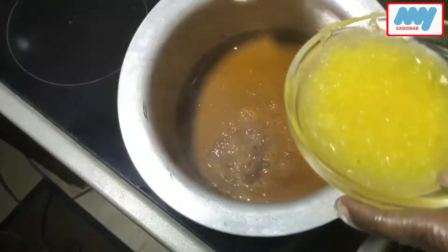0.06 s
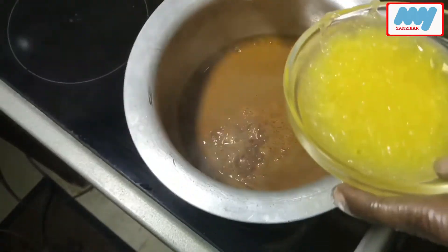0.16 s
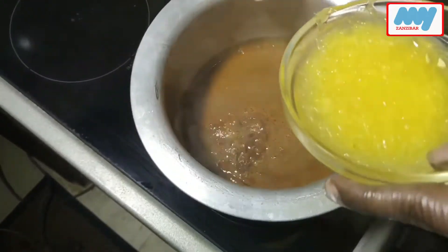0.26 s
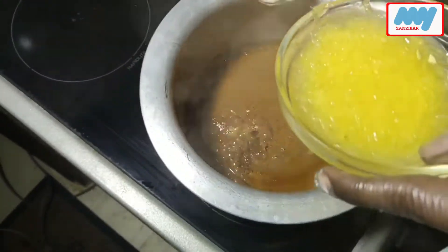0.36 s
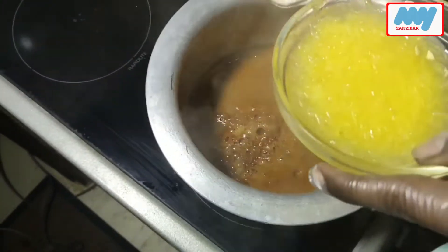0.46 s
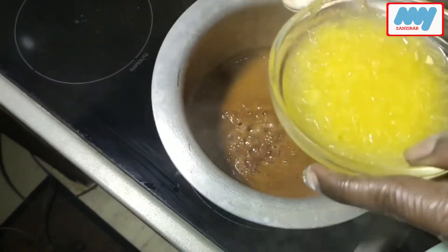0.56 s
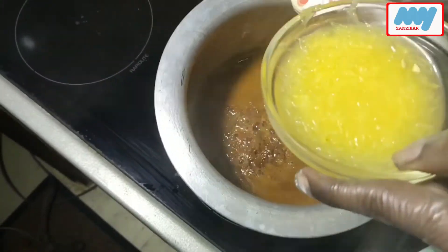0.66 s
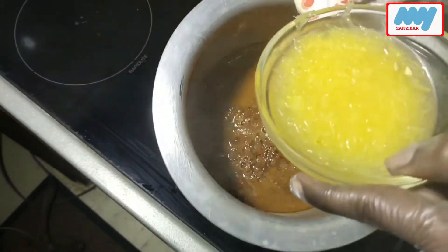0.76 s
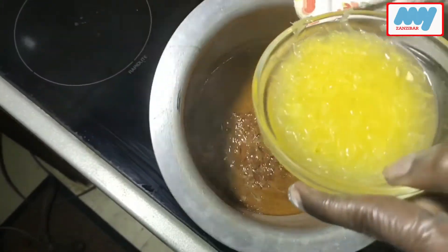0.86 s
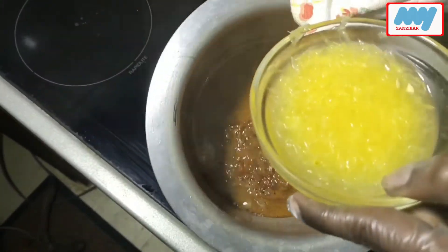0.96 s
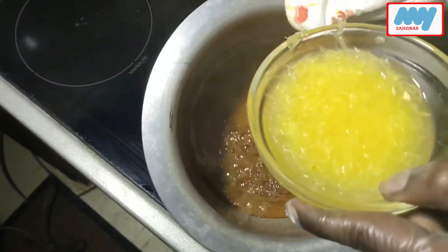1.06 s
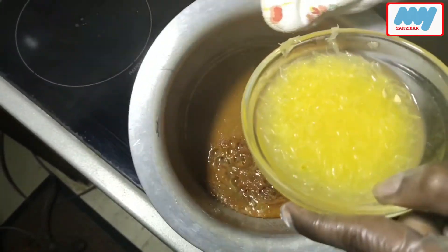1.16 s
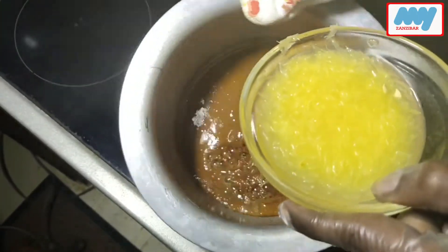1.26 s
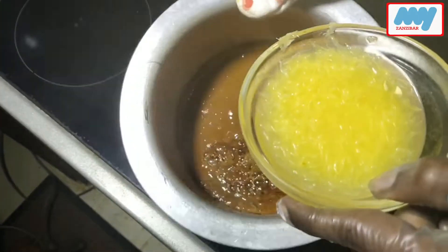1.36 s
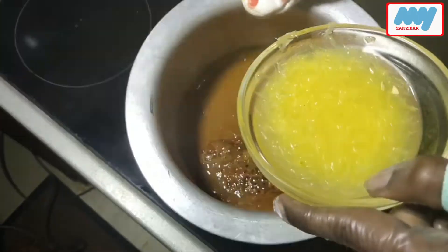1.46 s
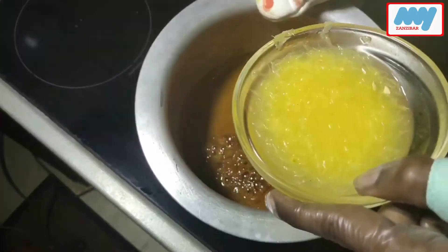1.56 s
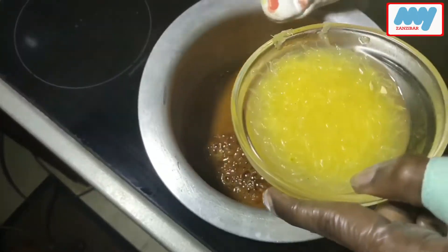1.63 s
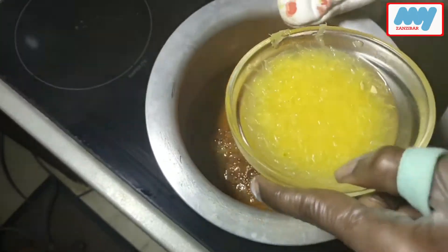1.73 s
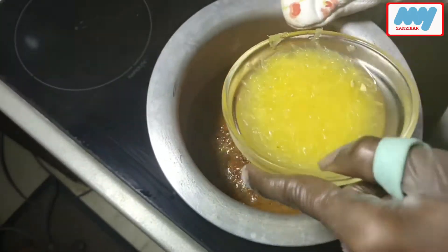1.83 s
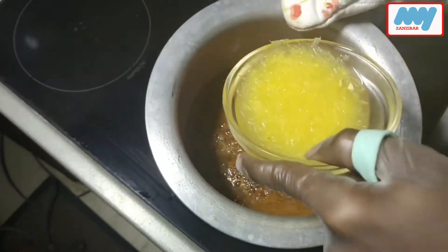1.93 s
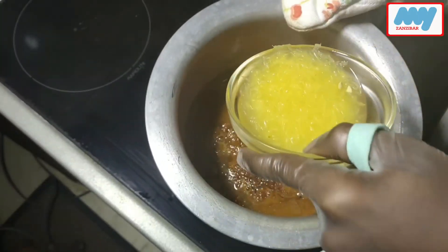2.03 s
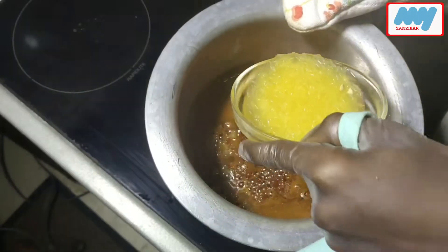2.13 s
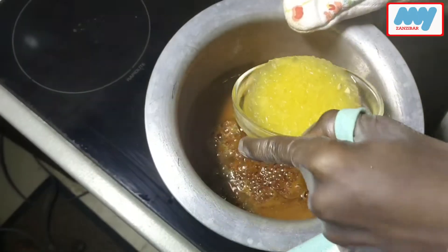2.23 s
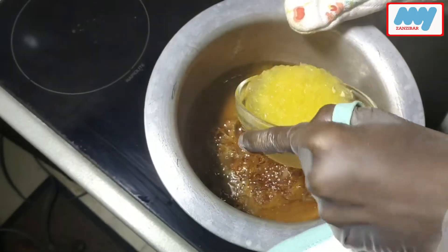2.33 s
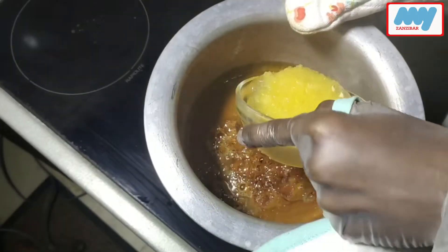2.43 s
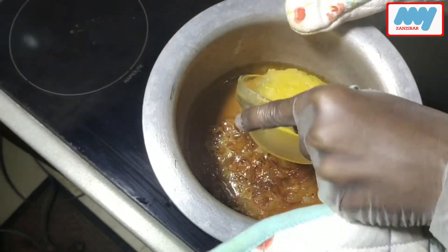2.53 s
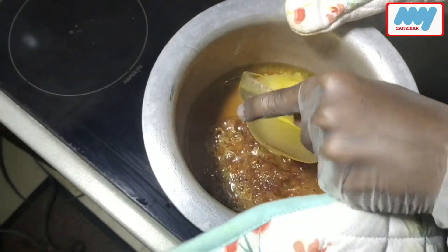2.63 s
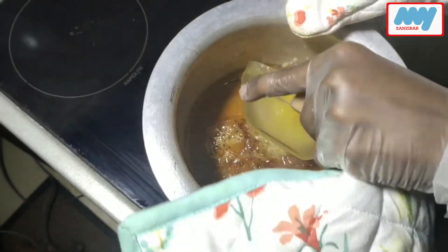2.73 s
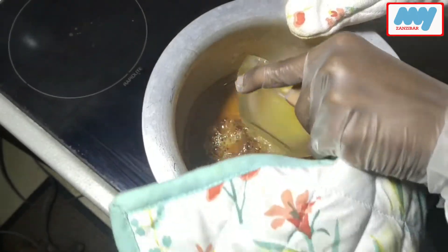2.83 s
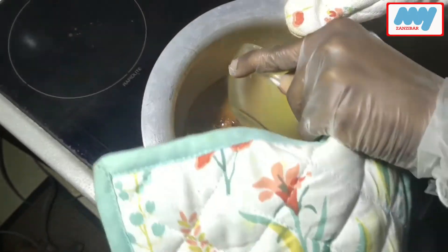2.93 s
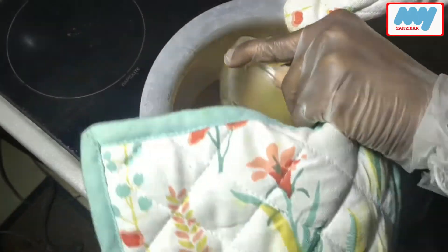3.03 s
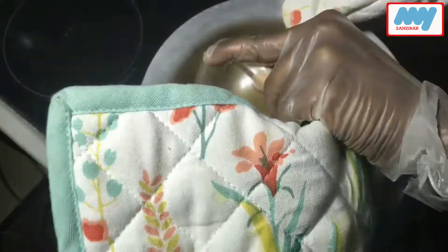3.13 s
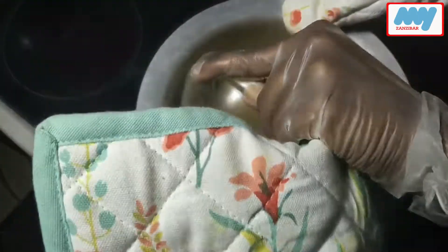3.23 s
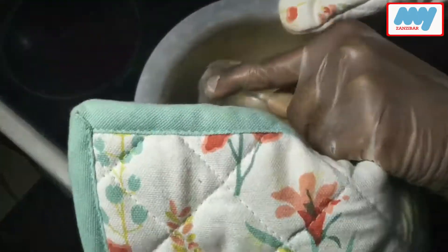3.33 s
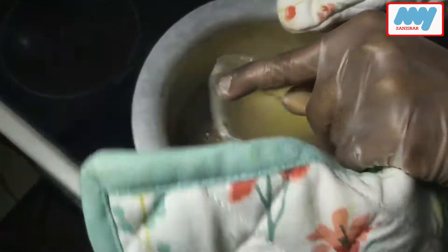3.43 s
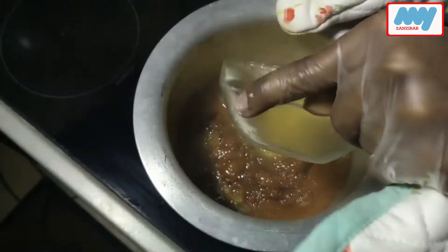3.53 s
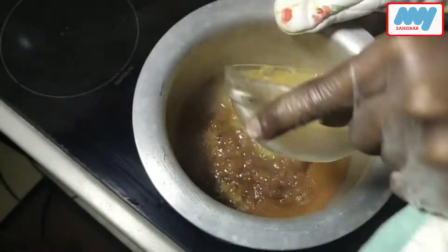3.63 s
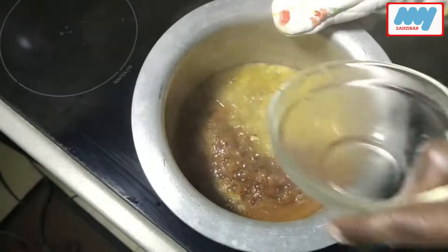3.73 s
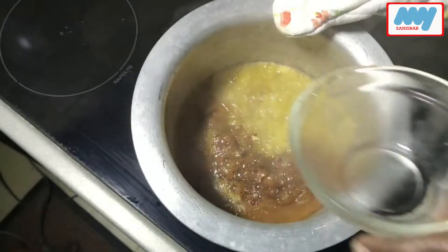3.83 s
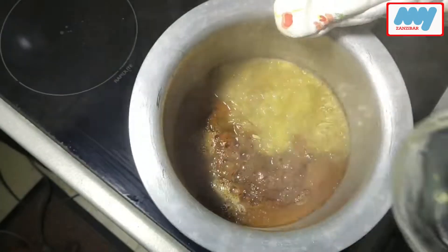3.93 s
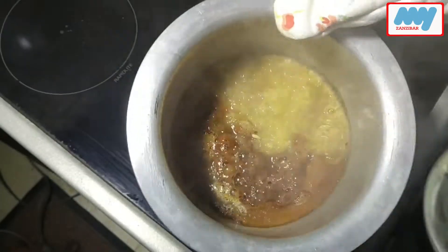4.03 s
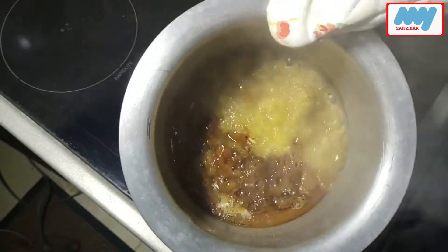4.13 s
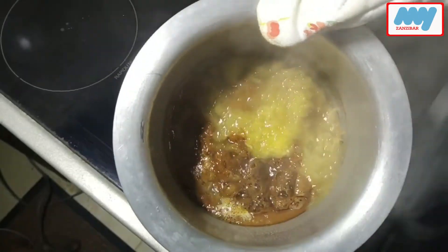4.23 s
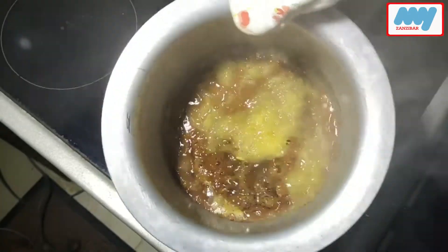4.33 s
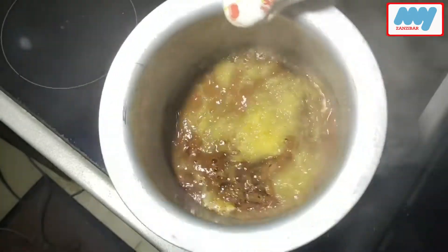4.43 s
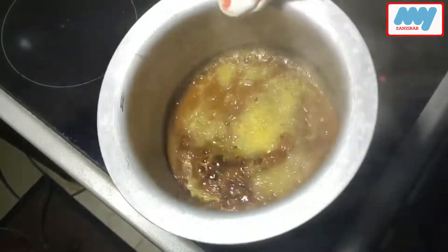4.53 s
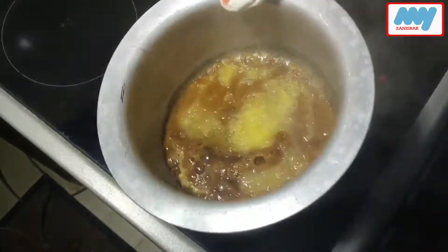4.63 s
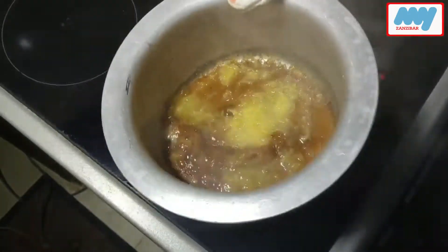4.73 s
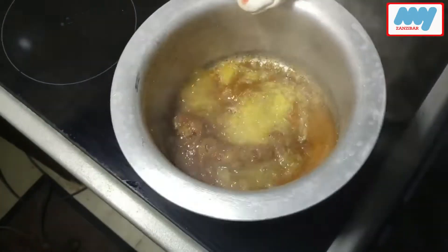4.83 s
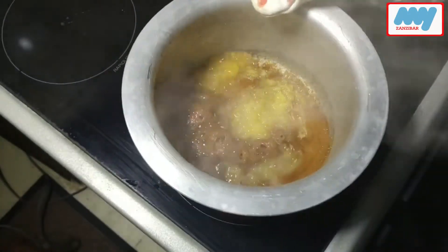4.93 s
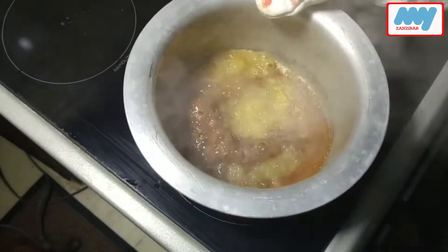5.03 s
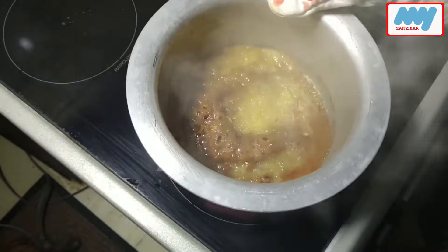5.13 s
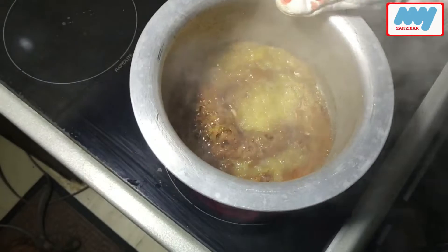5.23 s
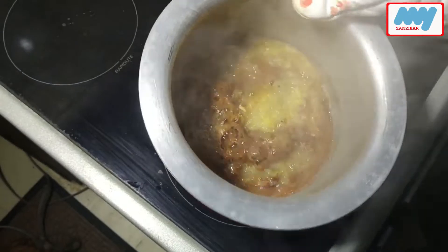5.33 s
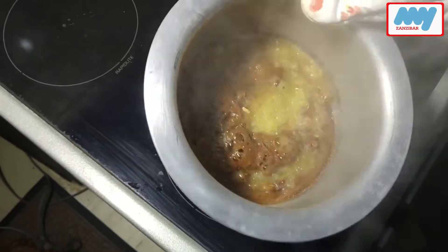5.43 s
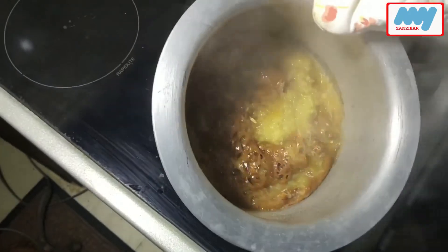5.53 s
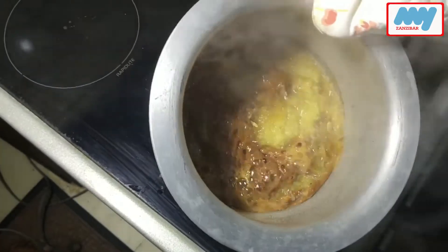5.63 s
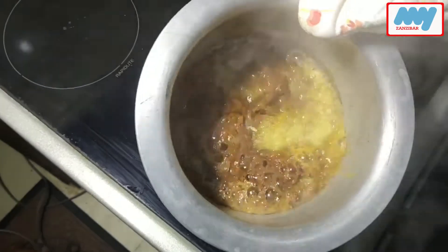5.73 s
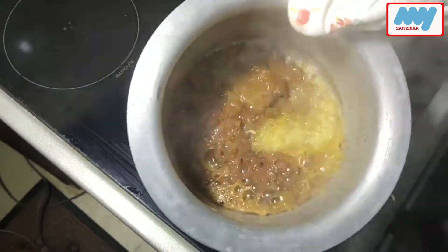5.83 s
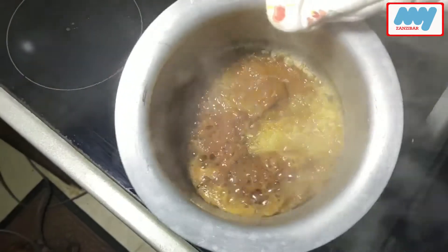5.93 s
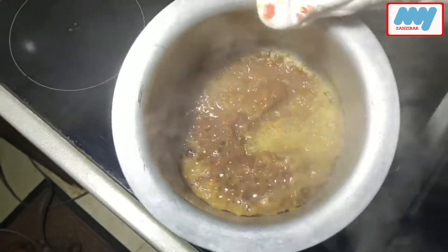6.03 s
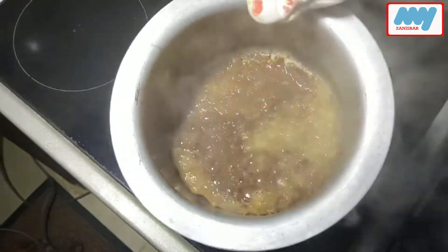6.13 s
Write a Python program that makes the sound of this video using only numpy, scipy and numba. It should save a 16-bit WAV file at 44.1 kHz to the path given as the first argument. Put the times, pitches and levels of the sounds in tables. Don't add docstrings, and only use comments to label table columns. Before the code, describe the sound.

Hot syrup hisses unevenly in a pot, with a soft early thud and crackling vents of steam. It quiets to near stillness, then poured juice brings burbling, squeaky bubble chirps and a rising, dense sizzle. Later the pot is rocked, thumping the glass hob, and the hiss peaks at the end. Close, central microphone in a kitchen, with a low buzz cycling on and off beneath.

```python
import sys
import numpy as np
from scipy import signal
from scipy.fft import rfft, irfft, next_fast_len
from scipy.io import wavfile
from scipy.ndimage import uniform_filter1d
from numba import njit

SR = 44100
rng = np.random.default_rng(int(sys.argv[2]) if len(sys.argv) > 2 else 0)


def convert_level_to_amplitude(level_db):
    exponent = np.asarray(level_db, float) / 20
    return 10 ** exponent


def unload_wav(signal):
    wavfile.write(
        sys.argv[1],
        SR,
        np.round(np.clip(np.atleast_2d(signal).T, -1, 1) * 32767).astype(np.int16),
    )


N = 272802
SIZE = next_fast_len(N)
FREQ = np.maximum(np.fft.rfftfreq(SIZE, 1 / SR), 1)
CALM_BOIL_DB, CALM_STEAM_DB = -44, -41


def unit(x):
    return x / np.sqrt(np.mean(x ** 2))


def curves(table):
    s, *columns = np.transpose(table)
    return [np.interp(np.arange(N) / SR, s, column) for column in columns]


def stage(times):
    return np.interp(np.arange(N) / SR, np.sort(times), (0, 1, 1, 0))


def walk(rate):
    hold = int(SR / rate)
    steps = np.repeat(rng.standard_normal(N // hold + 1), hold)[:N]
    return unit(uniform_filter1d(uniform_filter1d(steps, hold), hold))


def shape(x, gain):
    return irfft(rfft(x, SIZE) * gain, SIZE)[:N]


def colour(x, spectrum, lo_hz, hi_hz):
    hz, db = np.transpose(spectrum)
    edges = 1 / np.sqrt((1 + (lo_hz / FREQ) ** 16) * (1 + (FREQ / hi_hz) ** 16))
    tilt = convert_level_to_amplitude(np.interp(np.log(FREQ), np.log(hz), db))
    return unit(shape(x, tilt * edges))


def resonate(x, modes):
    power = 0
    for hz, width, db in modes:
        detune = (FREQ - hz * hz / FREQ) / width
        power = power + convert_level_to_amplitude(2 * db) / (1 + detune ** 4) ** 2
    return unit(shape(x, np.sqrt(power)))


def ring(t, hz, t60):
    return np.sin(2 * np.pi * hz * t) * np.exp(-np.log(1000) * t / t60)


@njit
def grains(start, hz, length, size, glide):
    out = np.zeros(N + SR)
    for k in range(len(start)):
        z, turn = size[k] + 0j, np.exp(2j * np.pi * hz[k] / SR)
        bend = np.exp(2j * np.pi * hz[k] * glide / SR / length[k])
        for i in range(length[k]):
            z = z * turn
            turn = turn * bend
            u = i / length[k]
            out[start[k] + i] += z.imag * u * (1 - u) * (1 - u)
    return out[:N]


def pops(rate, lo_hz, hi_hz, cycles, spread_db):
    when, pitch, ringing, size = rng.random((int(rate * N / SR), 4)).T
    hz = lo_hz + (hi_hz - lo_hz) * pitch
    length = (cycles * (0.21 + 1.72 * ringing) * SR / hz).astype(np.int64) + 8
    gain = convert_level_to_amplitude(spread_db * np.minimum(-np.log(size), 4.5)) / np.sqrt(length)
    return unit(grains((when * N).astype(np.int64), hz, length, gain, 0.03))


# (time [s], sizzle level [dB], fineness of the spray [dB])
STEAM = [(0, -31.5, -4.5), (.43, -37, 0), (.88, -43, 2), (1.21, -36.5, -3), (1.28, -29, 3),
         (1.62, -35.5, 3), (2.12, -46, -6), (2.79, -42, -4), (2.83, -36.5, 0), (3.35, -33.5, 3.5),
         (3.75, -25, 2.5), (4.4, -25.5, 1.5), (4.73, -27, 4), (4.88, -23, 3.5), (5.4, -29, -1.5),
         (5.65, -29.5, 2.5), (5.73, -21, -2.5), (6.19, -19.5, 1.5)]
# (frequency [Hz], level per Hz [dB])
SIZZLE_COLOUR = [(1500, 9), (2500, 8), (3500, -3.5), (5160, -3.5), (6200, -6), (9010, 3), (11100, -0.5),
                 (16000, -4.5)]
# (time [s], rise over the sizzle [dB], length [s])
SPURTS = [(0.085, 5, 0.1), (0.788, 6.5, 0.018), (0.962, 5, 0.014), (1.092, 6.5, 0.014), (1.136, 8.5, 0.014),
          (1.538, 5.5, 0.014), (1.655, 6, 0.02), (1.758, 8.5, 0.014), (1.833, 6.5, 0.02), (1.897, 0, .02),
          (1.952, 11, 0.019), (2.011, 7.5, 0.056), (2.124, 7.5, 0.014), (2.167, 5, 0.021),
          (2.195, 9.5, 0.015), (2.287, 7, 0.029), (2.315, 8, 0.019), (2.342, 9, 0.017), (2.395, 3, 0.068),
          (2.552, 5, 0.014), (2.602, 2, 0.03), (2.691, 7.5, 0.012), (2.721, 6.5, .01), (2.763, 8, 0.012),
          (2.835, 6, 0.028), (2.97, 2.5, 0.037), (3.03, 8, 0.016), (3.095, 6, 0.028), (3.135, 6.5, 0.029),
          (4.27, 1.5, 0.05)]
# (low [Hz], high [Hz], level [dB], share following the boil instead of the steam [0-1],
# pull of fineness [dB per dB], share of vents [0-1])
SPRAY = [(1846, 2400, -7.5, 0.81, -.3, 0.23), (3620, 6030, -4, 0.38, -.3, 0.49),
         (5860, 11440, -1.96, 0.038, .02, 0.94), (11200, 39000, -13.5, .05, 1.05, 0.73)]


def sizzle():
    t = np.arange(N) / SR
    (main_db, fine_db), boil_db = curves(STEAM), curves(BOIL)[0]
    flutter_db = np.interp(main_db, (-44, -28), (2.07, 0.54))
    vents_db = 0.15 * walk(14) + flutter_db * walk(40) + 0.26 * walk(150)
    for s, db, length in SPURTS:
        near = slice(max(int((s - 0.1) * SR), 0), int((s + 0.1) * SR))
        width = np.where(t[near] < s, 0.27, 0.35) * length
        vents_db[near] += db * np.exp(-0.5 * ((t[near] - s) / width) ** 2)
    bubbly_db = np.interp(main_db, (-44, -30), (-2.5, -6.5))
    bubbles = pops(rate=2200, lo_hz=2400, hi_hz=16000, cycles=75, spread_db=2.5)
    hiss = rng.standard_normal(N)
    source = (hiss + convert_level_to_amplitude(bubbly_db) * bubbles) / np.sqrt(1 + convert_level_to_amplitude(2 * bubbly_db))
    out = 0
    for lo, hi, db, boil_share, pull, vent_share in SPRAY:
        follow_db = main_db + boil_share * (boil_db - main_db) + pull * fine_db + vent_share * vents_db
        band = colour(source, SIZZLE_COLOUR, lo, hi)
        out = out + band * convert_level_to_amplitude(db + follow_db + 0.5 * walk(21.91))
    return out, vents_db


# (time [s], level [dB])
BOIL = [(0, -44), (.2, -42.5), (.5, -45), (1.2, -45.5), (1.3, -43.5), (1.8, -47.5), (2.5, -50.5),
        (2.77, -52.5), (2.84, -40), (3.1, -39.5), (3.55, -36), (3.85, -33.5), (4.27, -32), (4.66, -36),
        (4.9, -32.5), (5.58, -32.5), (5.74, -30), (6.19, -31.5)]
# (frequency [Hz], width [Hz], level [dB])
POT = [
    [(497, 87, 3), (608, 143, 6.5), (706, 100, 3)],
    [(819, 340, 2), (1069, 240, 5), (1184, 97, -1)],
    [(1341, 190, -5), (1498, 150, 1), (1620, 200, 0.5), (1800, 160, -17)],
    [(2684, 560, -3.5), (3140, 570, -1.5), (3600, 300, -7)],
]
# (calm-boil level [dB], slope [dB per dB of boil], under the bowl [dB],
# first splash [dB], share of vents [0-1])
ANSWER = [(-48.5, 0.6433, 2, 4, .05), (-49, 0.7256, -12, 7, 0.25), (-48, 0.81, -1, 11, 0.21),
          (-45.5, 0.96, -1.5, 3, 0.51)]
# (frequency [Hz], width [Hz], level [dB])
COVER_MODE = [(548, 154, 0)]
# (starts to sink [s], lowest [s], tips away [s], clear [s])
BOWL_S = (2.1, 2.45, 2.74, 2.81)
POUR_S, COVER_DB = (2.59, 2.66, 3.3, 3.9), -47


def boil(vents_db):
    low_pops = pops(rate=500, lo_hz=350, hi_hz=2000, cycles=10, spread_db=2.2)
    high_pops = pops(rate=300, lo_hz=2300, hi_hz=3800, cycles=40, spread_db=2.4)
    low = rng.standard_normal(N) + convert_level_to_amplitude(-19) * low_pops
    high = rng.standard_normal(N) + convert_level_to_amplitude(-17) * high_pops
    vigour, bowl, pour = curves(BOIL)[0] - CALM_BOIL_DB, stage(BOWL_S), stage(POUR_S)
    slow = uniform_filter1d(vigour, SR)
    sources, drives = (low, low, low, high), (slow, vigour, vigour, vigour)
    out = resonate(rng.standard_normal(N), COVER_MODE) * convert_level_to_amplitude(COVER_DB) * pour
    for modes, source, drive, answer in zip(POT, sources, drives, ANSWER):
        db, slope, bowl_db, splash_db, vent_share = answer
        answer_db = db + slope * drive + bowl * (bowl_db + splash_db * pour) + vent_share * vents_db
        out = out + resonate(source, modes) * convert_level_to_amplitude(answer_db + 0.7 * walk(25.02))
    return out


# (time [s], pitch
# [Hz], rms level [dB], length [s])
WHISTLES = [(0.109, 2760, -35.5, 0.018), (0.153, 2850, -35, .02), (0.453, 251, -51, 0.046),
            (0.532, 240, -44, 0.03), (4.95, 5370, -27, 0.022), (5.029, 5470, -22.5, .02),
            (2.119, 2990, -43, 0.0096), (2.125, 10000, -50, .01), (2.127, 7700, -43, .01),
            (2.173, 6900, -37, .01), (2.196, 5200, -35, 0.013), (2.2, 10000, -39, .01),
            (2.308, 5730, -36, .01), (2.345, 10100, -55, 0.013), (2.707, 557, -47, 0.036),
            (2.83, 5070, -35, .02), (2.822, 3600, -36, 0.016), (2.86, 2470, -38.5, 0.013),
            (2.875, 3410, -40, 0.022), (2.883, 2490, -35.5, 0.017), (2.904, 1466, -34, .03),
            (2.967, 2540, -27.5, .018), (2.971, 5170, -34, .02), (3.036, 2610, -35, 0.034),
            (3.143, 1650, -34, .04), (3.229, 1620, -32.5, 0.068), (3.375, 2660, -38, .03)]


def whistles():
    out = np.zeros(N)
    for s, hz, db, length in WHISTLES:
        t = np.arange(int(2 * length * SR)) / SR
        breath = uniform_filter1d(rng.standard_normal(8820), size=160)[:len(t)]
        tone = np.sin(2 * np.pi * hz * t + 10 * breath) * np.hanning(len(t))
        at = int((s - length) * SR)
        out[at:at + len(t)] += convert_level_to_amplitude(db - 1.5) * tone
    return out


# (time [s], thud peak [dB], thud pitch [Hz], rim over thud [dB], tick over thud [dB])
KNOCKS = [(0.5813, -20, 174, -8, -3), (0.691, -31.5, 200, 3, -5), (0.961, -38, 135, -14, -20),
          (1.8219, -30.5, 180, -4, 8), (1.874, -39, 175, 10, -6), (1.8839, -33, 175, -9, -20),
          (1.922, -45, 190, 3, -5.5), (2.0605, -53.5, 200, 22, 6), (3.956, -19.5, 186, 3.5, -16),
          (4.475, -29.5, 198, -3, -11), (5.0617, -9.5, 174, -7.5, -4), (5.197, -24.5, 196, 2, -16)]


def knocks():
    out, t = np.zeros(N + SR), np.arange(SR // 2) / SR
    rattle = resonate(rng.standard_normal(N), [(164, 43, -1), (264, 280, -11), (89.5, 87, -7.5)])
    rattle_swell = np.clip(t / 0.032, 0, 1) ** 2 * np.exp(-np.log(1000) * t / 0.52)
    late = np.maximum(t - 0.0019, 0)
    choke = np.exp(-(t / 0.0225) ** 3)
    tick = np.cos(2 * np.pi * 1200 * (t - 0.0011)) * np.exp(-((t - 0.001) / 0.0007) ** 2)
    rim = np.sin(2 * np.pi * 600 * (t - 0.0008)) * np.exp(-((t - 0.003) / 0.002) ** 2) * (t > 0.0008)
    for s, db, hz, rim_db, tick_db in KNOCKS:
        at = int(s * SR)
        thud = (ring(late, hz, 0.3) + convert_level_to_amplitude(-7) * ring(late, 1.42 * hz, 0.2)) * choke
        tail = convert_level_to_amplitude(-13.5) * rattle[at:at + len(t)] * rattle_swell
        contact = 0.73 * thud - convert_level_to_amplitude(rim_db) * rim - convert_level_to_amplitude(tick_db) * tick + tail
        out[at:at + len(t)] += convert_level_to_amplitude(db) * contact
    return signal.sosfilt(signal.butter(2, 105, "high", fs=SR, output="sos"), out[:N])


# (on [s], off [s], level [dB])
HOB = [
    (0.07, 0.264, -56),
    (0.387, 1.342, -54.5),
    (1.413, 2.3, -57),
    (2.423, 3.38, -54.5),
    (3.59, 4.296, -53),
    (4.47, 5.048, -55),
    (5.273, 5.88, -50),
]


def hob():
    t, power = np.arange(N) / SR, 0
    for on, off, db in HOB:
        power = power + convert_level_to_amplitude(db) * np.clip(np.minimum(t - on, off - t) / 0.0074, 0, 1)
    hum_hz = 203.4 * (1 + 0.00814 * walk(12))
    phase = 2 * np.pi * np.cumsum(hum_hz) / SR
    return np.sqrt(2) * power * np.sin(phase) * convert_level_to_amplitude(2.2 * walk(18))


# (frequency [Hz], level per Hz [dB])
RUMBLE_COLOUR = [(14, -40), (22, -25.5), (107, -20.5), (171, -4.5), (200, -1), (306, -11), (440, -9.5),
                 (600, -23)]
# (low [Hz], high [Hz], calm level [dB], slope [dB per dB of steam],
# slope [dB per dB of boil], level after a knock [dB])
RUMBLE_PARTS = [(15, 107, -68, 0.49, 0.34, -51.5), (94, 172, -63.5, 0.42, 0.16, -42.5),
                (193, 284, -60.5, 0.17, 0.07, -46), (310, 820, -67.5, .5, 0.52, -66)]
# (start [s], full [s], lifting [s], clear [s])
SHIELD_S = (1.7, 2.0, 2.4, 2.7)


def rumble():
    t, shudder = np.arange(N) / SR, 0
    steam, vigour = curves(STEAM)[0] - CALM_STEAM_DB, curves(BOIL)[0] - CALM_BOIL_DB
    for s, db, *_ in KNOCKS:
        since = np.maximum(t - s, 0)
        fade = convert_level_to_amplitude(db / 2 - 60 * since / 2.1)
        shudder = shudder + fade * np.minimum(since / 0.07, 1)
    noise, out = rng.standard_normal(N), 0
    for lo, hi, db, per_steam, per_boil, knock_db in RUMBLE_PARTS:
        kitchen = convert_level_to_amplitude(db + per_steam * steam + per_boil * vigour)
        gain = np.hypot(kitchen, convert_level_to_amplitude(knock_db) * shudder)
        sway_db = 1.8 * walk(11) - 9 * stage(SHIELD_S)
        out = out + colour(noise, RUMBLE_COLOUR, lo, hi) * gain * convert_level_to_amplitude(sway_db)
    return out


def scene():
    steam, vents_db = sizzle()
    mono = steam + boil(vents_db) + whistles() + knocks() + hob() + rumble()
    return np.array([mono, mono])


def top_cut(x):
    return signal.sosfilt(signal.butter(12, 16820, fs=SR, output="sos"), x)


# (time [s], low [Hz], high [Hz])
FILLS = [(.155, 6900, 8300), (.365, 5200, 6400), (.365, 11000, 12400), (.365, 13800, 15700),
         (1.225, 13100, 14500), (1.41, 4200, 5200), (4.195, 9000, 11000), (4.755, 5200, 6400),
         (4.755, 6900, 8300), (4.755, 11000, 12400), (5.265, 9000, 10400), (5.265, 11000, 12400),
         (6.168, 13100, 14500)]


def record(dry):
    mid, side = shape(dry[0], FREQ < 15720), np.zeros(N + SR)
    swell, f = np.hanning(2048), np.fft.rfftfreq(2048, 1 / SR)
    for s, lo, hi in FILLS:
        at = min(int(s * SR) - 1024, N - 2048)
        band = rfft(mid[at:at + len(swell)]) * (f > lo) * (f < hi)
        scatter = np.exp(2j * np.pi * rng.random(len(f)))
        side[at:at + len(swell)] += 0.63 * swell * irfft(band * scatter)
    side = side[:N]
    return top_cut(np.array([mid + side, mid - side]))


dry = scene()
out = record(dry)
unload_wav(out)
```